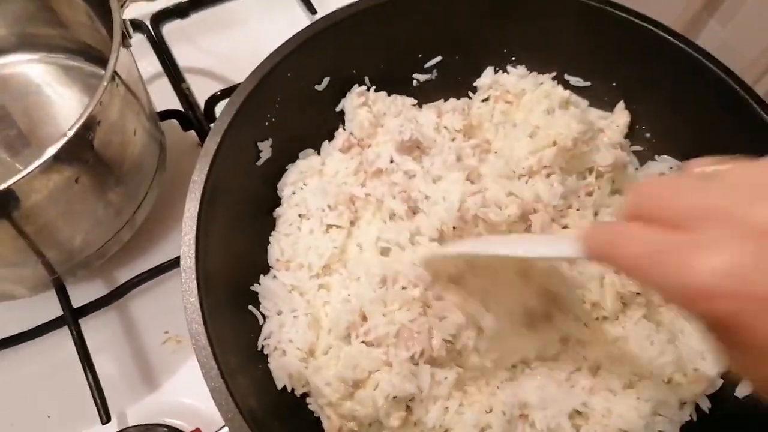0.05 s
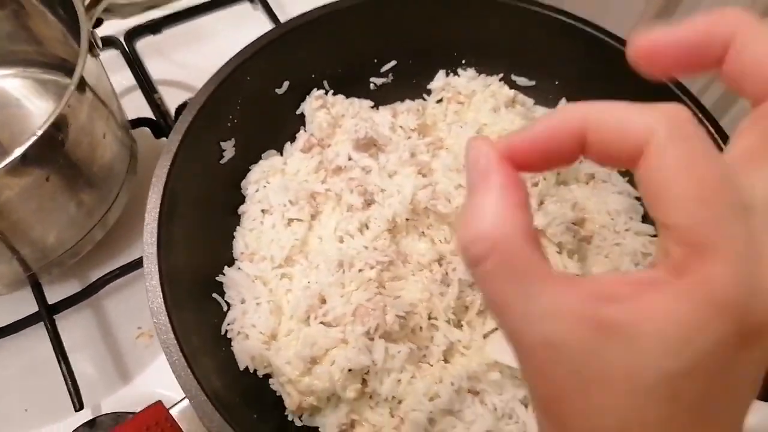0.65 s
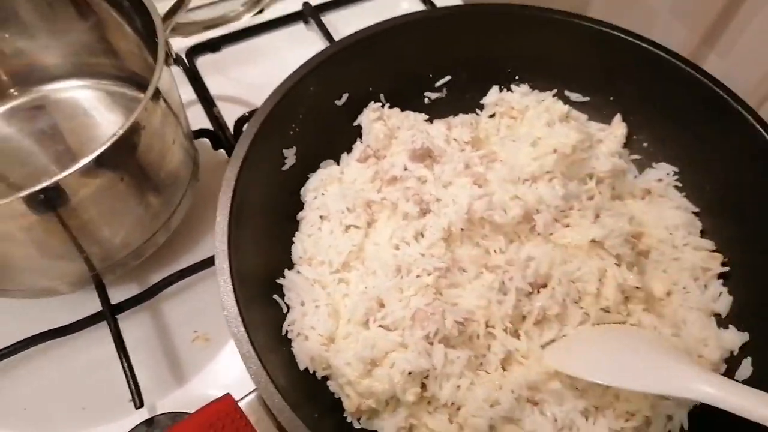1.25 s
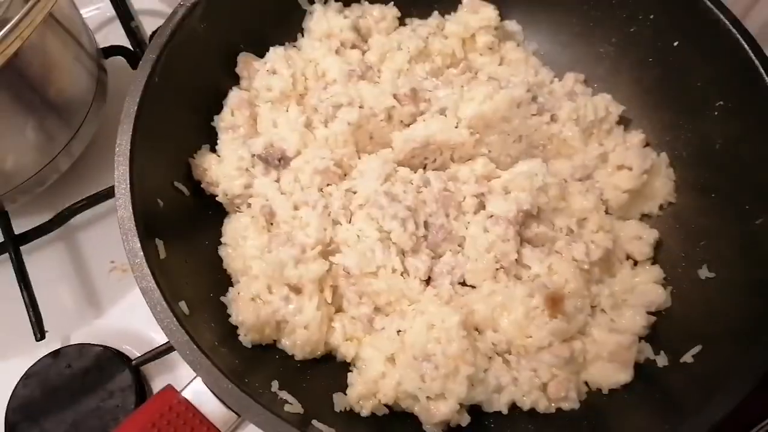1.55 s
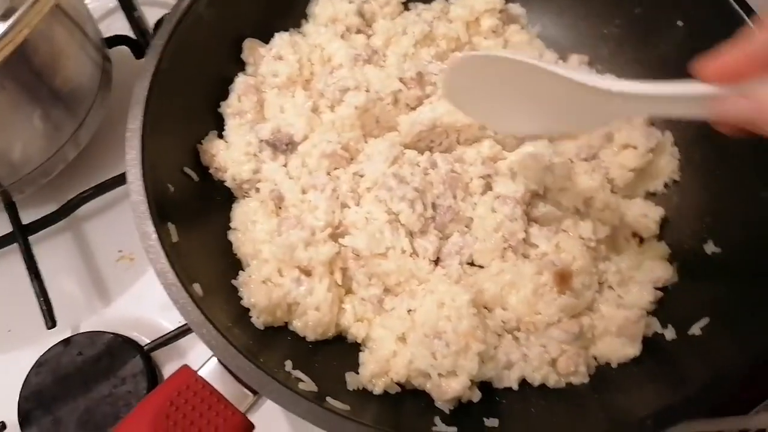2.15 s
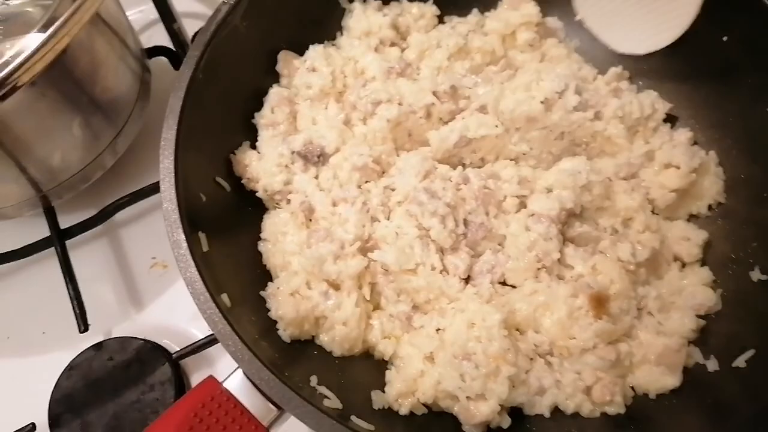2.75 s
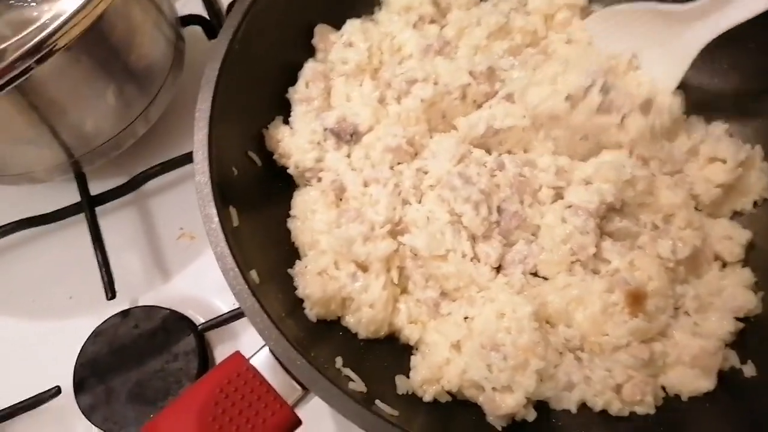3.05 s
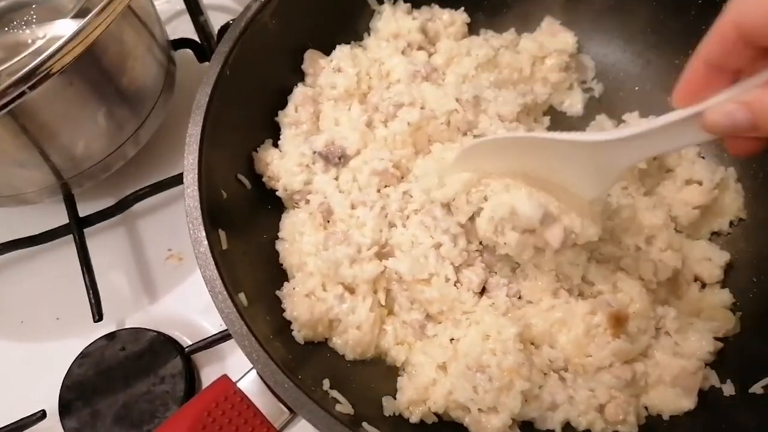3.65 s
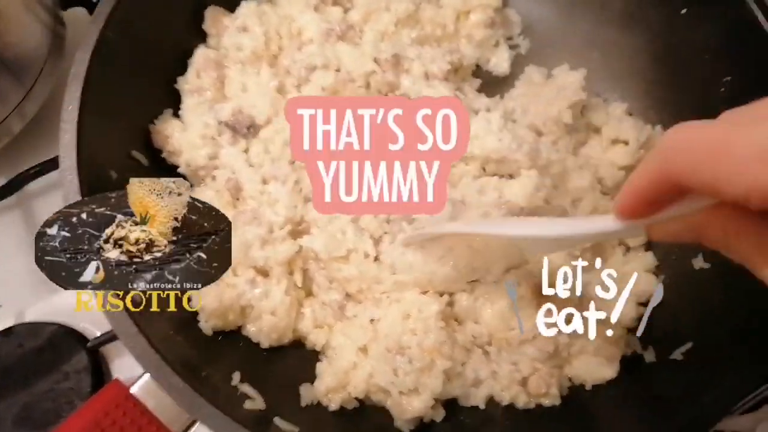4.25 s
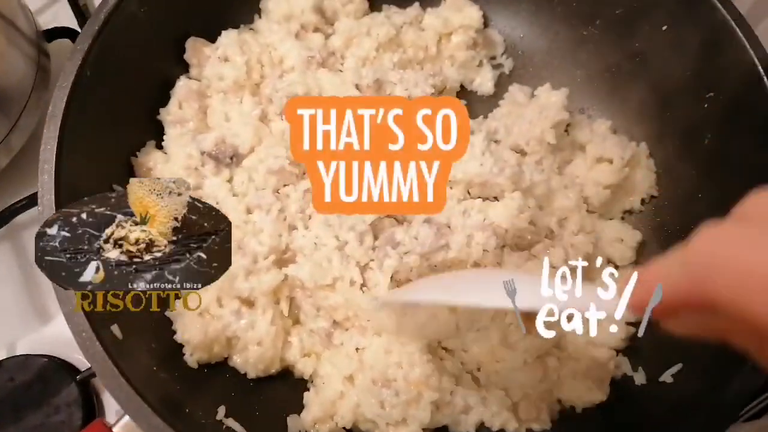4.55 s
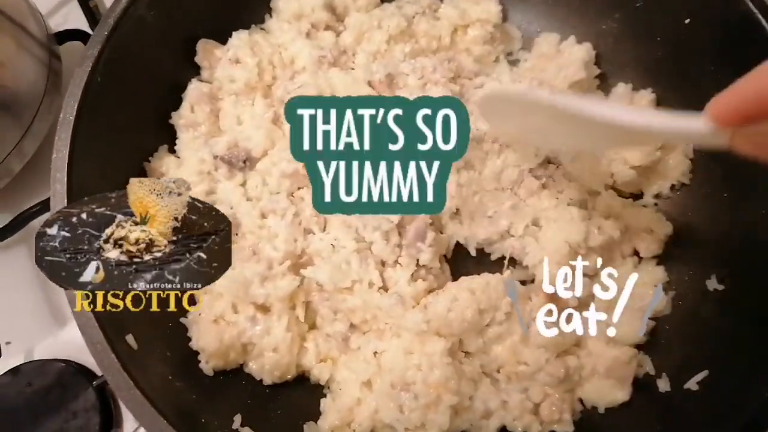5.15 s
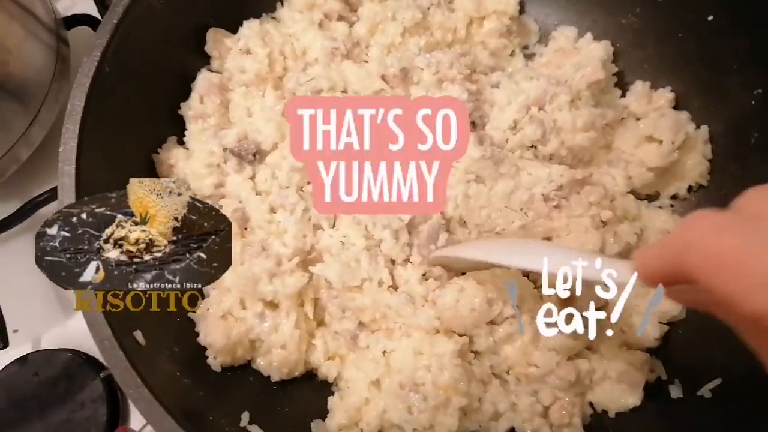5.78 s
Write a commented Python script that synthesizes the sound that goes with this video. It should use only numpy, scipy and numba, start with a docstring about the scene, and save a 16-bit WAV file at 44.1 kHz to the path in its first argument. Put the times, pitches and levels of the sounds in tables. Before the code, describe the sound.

Close to a frying pan in a kitchen, faint simmering and a light plastic clack sit over the low drone of a gas flame and extractor fan. The sound cuts out for a moment and returns with rice frying. A spatula pushes through it in uneven strokes, making wet smacks, flares of sizzle and soft rumbles of the pan, with sharp little pops of fat throughout.

```python
"""First you hear a gas burner roaring under a humming hood, and risotto barely simmering in a pan.
A plastic spatula is put down with a clack, and steam hisses out from under the rice.
After a short silence the rice sizzles: water turns to steam in hot fat, in countless tiny bursts.
Now the spatula stirs. Wet rice flares up on the bare metal, sticky grains squelch, the pan rumbles
on its grate, big bubbles pop and pockets of air smack flat."""
import sys
import numpy as np
from scipy import signal
from scipy.fft import rfft, irfft
from scipy.io import wavfile
from scipy.ndimage import uniform_filter1d
from numba import njit

SR = 44100
rng = np.random.default_rng(int(sys.argv[2]) if len(sys.argv) > 2 else 0)


def output_pcm(signal):
    """Save a mono or channel-first signal as 16-bit PCM at the path in sys.argv[1].

    Samples are clipped to [-1, 1] before scaling.
    """
    pcm = np.clip(np.atleast_2d(signal).T, -1, 1) * 32767
    wavfile.write(sys.argv[1], SR, np.round(pcm).astype(np.int16))


N = 265482
T = np.arange(N) / SR
OPPOSITE = np.array([[1], [-1]])  # plus on the left, minus on the right


def undb(db):
    """Turn decibels into a number to multiply by."""
    return 10 ** (np.asarray(db) / 20)


def unit(x):
    """Scale a sound to an average power of one."""
    return x / np.sqrt(np.mean(x ** 2))


def balance(left_db):
    """Left and right gains. A balance is how many dB louder the left side is than the right."""
    return undb(OPPOSITE * left_db / 2)


def curve(rows):
    """Join (time, value) points with straight lines."""
    return np.interp(T, *np.transpose(rows))


def add(out, start, sound):
    """Mix in a short stereo sound at a time in seconds."""
    i = int(start * SR)
    out[:, i:i + sound.shape[1]] += sound[:, :N - i]


def colour(x, points, size=1024):
    """Shape the tone through (Hz, dB) points. Nothing rings ahead of a click, so it stays sharp."""
    hz, db = np.transpose(points)
    log_hz = np.log(np.fft.rfftfreq(size, 1 / SR) + 1)
    log_gain = np.log(undb(np.interp(log_hz, np.log(hz), db)))
    cepstrum = irfft(log_gain)[:size // 2]
    cepstrum[1:] *= 2  # moves all the ringing to after the click
    response = irfft(np.exp(rfft(cepstrum, size)))
    return signal.fftconvolve(x, response[None], axes=1)[:, :N]


def wander(rate):
    """A smooth random wobble, about one in size, with `rate` new values a second."""
    hold = int(SR / rate)
    steps = rng.standard_normal(4096)[np.arange(N) // hold]
    return unit(uniform_filter1d(uniform_filter1d(steps, hold), hold))


def swell(start, length, rise, fade):
    """A loudness shape that rises, holds and dies away (all times in seconds)."""
    return np.clip((T - start) / rise, 0, 1) * np.exp(-np.maximum(T - start - length, 0) / fade)


def swells(events, fade_s):
    """Left and right gains for many swells; where they overlap, their powers add."""
    return np.sqrt(sum((undb(db) * balance(left_db) * swell(start, length, rise, fade_s)) ** 2
                       for start, rise, length, db, left_db in events))


def noise_band(hz, sharpness, samples):
    """Two separate noises, each filtered twice around one pitch."""
    b, a = signal.iirpeak(hz, sharpness, fs=SR)
    return signal.lfilter(b, a, signal.lfilter(b, a, rng.standard_normal((2, samples))))


def hollow_rush(resonances, stereo_db):
    """Swirling air rings a hollow space, a little differently on the left and right."""
    out = 0
    for hz, width, db, left_db in resonances:
        shared, apart = noise_band(hz, hz / (2 * width), N)
        out = out + undb(db) * balance(left_db) * (shared + undb(stereo_db) * apart * OPPOSITE)
    return unit(out)


@njit
def pings(starts, hz, decay, sizes, n):
    """Quickly fading tones, each reaching the left and right at its own time and strength."""
    out = np.zeros((2, n))
    for k in range(len(hz)):
        turn_and_fade = np.exp(2j * np.pi * hz[k] / SR - 1 / (decay[k] * SR))
        for side in range(2):
            tone, first = sizes[side, k] + 0j, int(starts[side, k] * SR)
            for i in range(max(first, 0), min(first + int(6 * decay[k] * SR), n)):
                tone *= turn_and_fade
                out[side, i] += tone.imag
    return out


def bubbles(rate, low_hz, high_hz, decay_ms, spread_db, scatter_db=1.5, bounce=0.97):
    """Tiny bubbles burst all over the pan, `rate` a second: many faint ones, a few strong ones."""
    when, pitch, life, size, place, side, left_path, right_path = rng.random((int(rate * N / SR), 8)).T
    low, high = (np.broadcast_to(edge, N)[(when * N).astype(int)] for edge in (low_hz, high_hz))
    hz = low + (high - low) * pitch
    decay = decay_ms / 1000 * 2 ** (2 * life - 1)
    strength = undb(-spread_db * np.log(size + 0.0018)) * balance(scatter_db * (2 * side - 1))
    starts = when * N / SR + OPPOSITE * (place - .5) * .0003
    echo_s = .0003 + .002 * np.array([left_path, right_path])  # a bounce off the pan wall
    return pings(starts, hz, decay, strength, N) + bounce * pings(starts + echo_s, hz, decay, strength, N)


def sputter(rate, tail_s, spread_db):
    """Puffs of spray, about `rate` a second: each starts at once and dies within milliseconds."""
    chance, size = rng.random((2, N))
    energy = (chance < rate / SR) * undb(-spread_db * np.log(size + 0.015)) ** 2
    fading = signal.lfilter([1], [1, -np.exp(-2 / (tail_s * SR))], energy + 1e-18)
    return np.sqrt(fading) * rng.standard_normal((2, N))


def kitchen(x, room_db, near_db, room_s=0.11, near_s=0.012):
    """Quick echoes from the stove top and tiles, then the fading echo of the small room."""
    t = T[:SR // 5]
    echo = 0
    for db, fade_s in ((near_db, near_s), (room_db, room_s)):
        tail = rng.standard_normal((2, len(t))) * (t > .001) * np.exp(-np.log(1000) * t / fade_s)
        echo = echo + undb(db) * tail / np.sqrt(np.sum(tail ** 2) / 2)
    return x + signal.fftconvolve(x, echo, axes=1)[:, :N]


def delay_left(x, ms):
    """Make the left side later than the right (earlier if negative)."""
    return np.array([np.interp(T - sign * ms / 2000, T, side) for sign, side in zip((1, -1), x)])


# The simmering part and the sizzling part: (start [s], end [s])
PARTS = [(-1, 1.413), (1.851, 7)]
def by_part(first, second):
    """Use one value until the first part ends, and the other from then on."""
    return np.where(T > PARTS[0][1], second, first)


# Hollow notes of the stove and hood: (pitch [Hz], rough width [Hz], level [dB], balance [dB])
STOVE_NOTES = [(31.8, 18, -15, 2.5), (78, 26, 1.5, 2.5), (112.3, 19.7, -0.5, 6), (160.1, 11.7, 2, 4),
               (198.3, 9.2, -4, 5.5), (252.3, 26.3, 1.5, 1), (300, 25, -6, -4), (395, 153, -10.5, -4)]
# Notes of the gas jet in the burner: (pitch [Hz], rough width [Hz], level [dB], balance [dB])
JET_NOTES = [(810, 41, -5, 5.5), (900, 50, -7, 3.5), (1002, 22, 1, 6), (1061, 25.4, 2.5, 4.5),
             (1102, 29, 0, 6), (1143, 31.5, 0.5, 2), (1212, 16, -4.5, 3), (1492, 81, -7, 3.5)]
# Tone of the hissing gas: (frequency [Hz], level [dB])
GAS_TONE = [(100, -19), (500, 1.5), (1400, 1.5), (2000, -7.5), (2800, -9.5), (3600, -18), (5800, -26),
            (8500, -37), (12000, -37), (16000, -48.5)]
def burner():
    """The flame roars low, while the gas jet makes a hollow rush and a broad hiss."""
    roar = hollow_rush(STOVE_NOTES, stereo_db=-14) * undb(by_part(-44.5, -46.5))
    jet = hollow_rush(JET_NOTES, stereo_db=-7.5) * undb(by_part(-47, -49.5) + 1.5 * wander(6.9))
    shared, apart = rng.standard_normal((2, N))
    hiss = unit(colour(shared + undb(-1.5) * apart * OPPOSITE, GAS_TONE))
    return roar + jet + hiss * undb(-52.5 + 1.1 * wander(22))


# Tones of the hood fan: (pitch [Hz], level in first part [dB], level in second part [dB])
FAN_TONES = [(198.9, -52.5, -61.5), (247.9, -62.5, -60), (757, -88, -67.5), (1161, -78, -63)]
def hood_fan():
    """The fan hums, and draughts make its loudness and pitch waver."""
    waver_hz, waver_db = 2.8, 2.8
    hum = 0
    for hz, first_db, second_db in FAN_TONES:
        phase = 2 * np.pi * np.cumsum(hz + waver_hz * wander(16)) / SR
        level = undb(by_part(first_db, second_db) + waver_db * wander(14))
        hum = hum + np.sqrt(2) * level * np.sin(phase)
    return hum


# Tone of bubbles under the rice: (frequency [Hz], level [dB])
SIMMER_TONE = [(600, -25), (1500, 11.5), (2600, 1), (4000, -5.5), (5800, -10), (8200, -18.5),
               (10000, -17.5), (13000, -32), (16000, -50)]
def simmer():
    """A fine fizz, muffled by the resting rice, slowly settles off to the right."""
    fizz = colour(bubbles(9000, 800, 15000, decay_ms=0.17, spread_db=2.5), SIMMER_TONE)
    settling = undb(-58.5 - 1.5 * T)
    return unit(kitchen(fizz, room_db=-7.5, near_db=-15)) * settling * balance(-15.5) * by_part(1, 0)


# Soft bumps through the rice: (time [s], level [dB], pitch [Hz])
BUMPS = [(.025, -38.5, 189), (.11, -33, 74), (.695, -36, 70), (1.86, -40, 285), (1.915, -36, 273),
         (2.521, -41, 247), (2.56, -36, 150), (3.299, -36.5, 98.5), (3.327, -37, 152), (4.701, -40, 132),
         (5.233, -36, 155), (5.461, -34.5, 262)]
# Knocks on the pan: (time [s], level [dB], balance [dB], dull above [Hz], amount of ring [0-1])
KNOCKS = [(0.3848, -30, -9.5, 4840, 0.5), (0.389, -34.5, -4, 4600, 0.5), (3.842, -31.5, 4, 6500, 0.25),
          (4.085, -23.5, -5, 9400, 0.13)]
# Notes the spatula and pan ring with: (pitch [Hz], level [dB], time to fade by 60 dB [s])
PAN_NOTES = [(1390, 4, 0.035), (1470, 5.5, 0.05), (2250, 1, 0.04), (2450, 8, 0.04), (2740, 7.5, 0.045),
             (3170, -1, 0.032), (3860, -6, .035), (4450, -1.5, 0.04), (4800, -2, .04), (5210, -2, .04),
             (5680, -1.5, .045)]
def spatula():
    """Plastic clacks briefly ring the pan; bumps cushioned by rice only thud."""
    out, t = np.zeros((2, N)), T[:SR // 6]
    for start, db, left_db, dull_hz, ring_amount in KNOCKS:
        ring = 0
        for hz, note_db, fade_s in PAN_NOTES:
            phase = 2 * np.pi * (hz * t + rng.random((2, 1)) / 3)
            ring = ring + undb(note_db) * np.sin(phase) * np.exp(-np.log(1000) * t / fade_s)
        crack = rng.standard_normal((2, len(t))) * np.exp(-t / 0.0026)
        band = signal.butter(3, [1200, dull_hz], "band", fs=SR)
        clack = signal.lfilter(*band, crack + 0.21 * ring_amount * ring)
        add(out, start, undb(db) * balance(left_db) * clack / np.abs(clack).max())
    age = t / 0.0042  # a bump's swell peaks at age one
    for start, db, hz in BUMPS:
        add(out, start, undb(db) * np.sin(2 * np.pi * hz * t) * age * np.exp(1 - age) * balance(1.4))
    return kitchen(out, room_db=-11, near_db=-6.5)


# Tone of the escaping steam: (frequency [Hz], level [dB])
STEAM_TONE = [(1000, -23), (3000, 11.5), (4500, 0.5), (5800, 3.5), (7800, -5.5), (8600, -22),
              (11000, -17.5), (13000, -28)]
def steam():
    """Late in the first part, steam finds a way out from under the rice and hisses."""
    start_s, rise_s = 1.125, 0.079
    hiss = unit(colour(sputter(2515, tail_s=.002, spread_db=-1), STEAM_TONE))
    escaping = undb(-64.5) * np.clip((T - start_s) / rise_s, 0, 1)
    return hiss * escaping * balance(-18) * by_part(1, 0)


# Tone of rice left to fry: (frequency [Hz], level [dB])
SIZZLE_TONE = [(300, -11.5), (900, -16), (2000, 2.5), (3500, 0), (5400, -0.5), (6500, -0.5), (7700, -1),
               (9800, -4), (11500, -12.5), (13000, -13.5), (15500, -22)]
def sizzle():
    """Water flashes to steam in hot fat: fizz, spray and stray ticks, growing as the pan heats."""
    start_db, heating_db_per_s = -51, 0.96
    fizz = unit(bubbles(12000, 484, 14600, decay_ms=0.079, spread_db=4))
    spray = unit(sputter(160, tail_s=0.005, spread_db=0))
    ticks = unit(bubbles(90, 2700, 10400, decay_ms=0.11, spread_db=1.3, scatter_db=0, bounce=0.37))
    frying = colour(fizz + undb(-5) * spray + undb(-11) * ticks, SIZZLE_TONE)
    heating = undb(start_db + heating_db_per_s * (T - PARTS[1][0]))
    return unit(kitchen(frying, room_db=-6, near_db=-17, room_s=0.17)) * heating


# Surges of sizzle: (time [s], rise [s], length [s], level [dB], crackle pitch [Hz], balance [dB])
FLARES = [(1.82, 0.022, 0.17, -49, 5500, -0.5), (2.432, .03, 0.049, -48.5, 4200, 8),
          (2.53, 0.026, 0.22, -57.5, 5000, 16), (2.872, 0.033, 0.084, -53, 4600, 7),
          (2.955, 0.023, 0.034, -40, 8500, -1), (2.99, 0.034, 0.17, -44, 4900, 1.5),
          (3.147, 0.036, 0.21, -46.5, 5100, 0.5), (3.556, 0.025, 0.18, -54, 5500, 0),
          (3.822, 0.023, 0.029, -49, 4800, 3), (3.93, 0.031, 0.105, -47.5, 5200, 0.5),
          (4.18, 0.037, 0.13, -50.5, 6000, -1), (4.67, 0.017, 0.21, -50.5, 5800, -1),
          (4.832, 0.11, 0.14, -44, 6000, -1.5), (4.95, 0.036, 0.094, -44.5, 4400, 0),
          (5.044, 0.049, 0.076, -45.5, 3900, -2), (5.24, 0.03, 0.051, -48.5, 5000, 0),
          (5.31, 0.033, 0.3, -49, 5500, 0.5), (5.788, 0.04, 0.064, -45.5, 5200, 1)]
# Tone of a fresh flare, finer than the resting sizzle: (frequency [Hz], level [dB])
FLARE_TONE = [(300, -15), (900, -19), (2000, -1), (3500, 2.5), (5200, 0), (6500, -1.5), (7700, -1),
              (9800, -3.5), (11500, -12.5), (13000, -21), (15500, -20)]
def flares():
    """Wet rice lands on bare metal and flares into a fine hiss with small crackling bubbles."""
    hiss = colour(sputter(650, tail_s=0.0036, spread_db=2.2), FLARE_TONE)
    pitch = curve([(start + length / 2, hz) for start, _, length, _, hz, _ in FLARES])
    crackle = bubbles(2500, 0.8 * pitch, 1.2 * pitch,
                      decay_ms=0.28, spread_db=2.5, scatter_db=8, bounce=0.35)
    flaring = swells([(start, rise, length, db, left_db)
                      for start, rise, length, db, _, left_db in FLARES], fade_s=0.038)
    return unit(unit(hiss) + undb(-5) * unit(crackle)) * flaring


# Tone of sticky wet grains: (frequency [Hz], level [dB])
SQUELCH_TONE = [(200, -18.5), (450, -1.5), (700, -10), (1000, -8), (1600, 3.5), (2100, -3.5), (2700, -0.5),
                (3400, -4.5), (5000, -23), (10000, -41)]
# Spatula strokes through the rice:
# (time [s], length [s], squelch level [dB], air pocket pitch [Hz], rumble level [dB], balance [dB])
STROKES = [(1.83, 0.26, -50.5, 2360, -57, 3), (2.168, 0.058, -44.5, 2600, -65.5, -1),
           (2.312, 0.082, -58, 2500, -45.5, 9), (2.416, 0.089, -45, 2550, -44, 3),
           (2.501, 0.099, -48, 2450, -45, 2), (2.6, 0.25, -57, 2800, -47.5, 17),
           (2.868, 0.066, -55, 2930, -49, 11), (3.105, 0.15, -47, 2120, -74, 2.5),
           (3.56, 0.14, -50, 2300, -49, 0), (3.721, 0.023, -43.5, 2700, -43, -1),
           (3.825, 0.041, -50, 3180, -43.5, -2), (3.96, 0.08, -48, 2180, -48.5, -3),
           (4.25, 0.036, -48, 2310, -53, -4), (4.648, 0.071, -51, 2460, -45.5, 0),
           (4.976, 0.16, -48.5, 1860, -56, -3), (5.293, 0.15, -46.5, 2850, -47, -3.5),
           (5.532, .1, -48.5, 2800, -47.5, -2), (5.72, 0.052, -52, 2400, -43.5, -3),
           (5.781, 0.085, -47, 2120, -65, -4), (5.98, .06, -50, 2400, -51, -6)]
STROKE_RISE_S, STROKE_FADE_S = 0.021, 0.023
def squelch():
    """Wet rice bubbles with dull clicks; strokes pull sticky grains apart and ring air pockets."""
    grains = unit(bubbles(2500, 280, 5000, decay_ms=0.16, spread_db=3.3))
    spray = unit(sputter(150, tail_s=0.0039, spread_db=1.5))
    clicks = unit(kitchen(colour(grains + undb(-3) * spray, SQUELCH_TONE), room_db=-7.5, near_db=-11.5))
    pitch = curve([(start + length / 2, hz) for start, length, _, hz, _, _ in STROKES])
    pockets = unit(bubbles(1300, 0.827 * pitch, 1.095 * pitch, decay_ms=1, spread_db=2))
    stirring = swells([(start, STROKE_RISE_S, length, db, left_db)
                       for start, length, db, _, _, left_db in STROKES], STROKE_FADE_S)
    click_level = np.hypot(undb(-52), undb(-1.5) * stirring)  # steady bubbling plus the strokes
    return clicks * click_level + pockets * undb(-4.5) * stirring


def rumble():
    """Each stroke shoves the pan on its grate and wakes the stove's hollow notes."""
    push = sum(undb(db) * swell(start, length, STROKE_RISE_S, STROKE_FADE_S)
               for start, length, _, _, db, _ in STROKES)
    return hollow_rush(STOVE_NOTES, stereo_db=-23) * push


# The loudest bursts: (time [s], level [dB], pitch [Hz], decay [ms], balance [dB])
POPS = [(1.8885, -36, 4450, 0.096, -4), (1.916, -27.5, 6100, 0.19, -2), (1.938, -31, 6300, .12, 0),
        (1.9643, -38, 5500, .1, -3), (2.0239, -34, 5600, .12, -2), (2.0308, -30.5, 7300, .06, -7),
        (2.254, -32, 6700, .06, 10), (2.2745, -28, 7900, 0.045, 6), (2.7328, -36, 3630, 0.32, 5),
        (2.8936, -37.5, 4370, .35, 8), (2.9073, -31, 4450, 0.12, 4), (2.9394, -29.5, 6200, 0.064, 6),
        (3.019, -29, 4770, .1, 2), (3.056, -27.5, 5170, .13, -4), (3.112, -26, 4800, 0.12, -10),
        (3.1532, -23.5, 5070, 0.15, -2), (3.2265, -26, 5960, 0.08, 2), (3.265, -31, 5340, 0.27, 5),
        (3.283, -23.5, 5360, 0.14, 11), (3.3155, -32, 5760, .16, 8), (3.3422, -31.5, 9260, .1, -5),
        (3.423, -32, 3960, 0.087, -8), (3.5818, -32.5, 4430, 0.14, -1), (3.888, -36, 5900, 0.086, -1),
        (4.0236, -29, 4040, 0.085, -1), (4.2776, -33, 3900, 0.096, -4), (4.3154, -31, 9600, .06, -5),
        (4.3634, -29, 7200, .07, -3), (4.413, -30.5, 6200, 0.12, -3), (4.4499, -33, 4250, 0.074, -3),
        (4.5403, -27.5, 6670, .06, -1), (4.747, -27, 7450, 0.047, 5), (4.8936, -26, 8000, 0.069, 4),
        (4.9547, -24, 5900, 0.034, 7), (5.469, -30, 5500, .08, -6), (5.5093, -29.5, 3180, 0.09, 3),
        (5.6636, -24.5, 6100, 0.057, -4), (5.8459, -26.5, 5400, .15, 0), (5.915, -33, 7300, 0.065, 4)]
def pops():
    """Big bursts of fat, steam and trapped air: each swells in a cycle or two and dies as fast."""
    out, t = np.zeros((2, N)), T[:SR // 30]
    for start, db, hz, decay_ms, left_db in POPS:
        age = 1000 * t / decay_ms
        add(out, start, undb(db) * balance(left_db) * np.sin(2 * np.pi * hz * t) * age * np.exp(1 - age))
    return kitchen(out, room_db=-8, near_db=-2.5, near_s=0.022)


# Wet smacks in the rice: (time [s], level [dB], pitch [Hz])
SMACKS = [(2.206, -42, 2660), (2.219, -48, 2700), (2.442, -41.5, 2570), (2.466, -48, 2560),
          (2.546, -43, 2550), (2.731, -49, 1680), (3.135, -43, 2900), (3.741, -47, 2770),
          (4.993, -42, 1870), (5.039, -41, 1750), (5.056, -45, 1800), (5.385, -42, 2770),
          (5.546, -47, 1650), (5.82, -48, 2200), (5.845, -40, 2060)]
def smacks():
    """The spatula squeezes an air pocket flat, and the air leaves in one short gush."""
    rise_s, sharpness = 0.0028, 1 / 0.24
    out, age = np.zeros((2, N)), T[:SR // 20] / rise_s
    for start, db, hz in SMACKS:
        gush = unit(noise_band(hz, sharpness, len(age)))
        add(out, start, undb(db) * gush * age * np.exp(1 - age) * balance(2.5))
    return out


# Notes of the pan's bowl shape: (pitch [Hz], width [Hz], level [dB])
BOWL_NOTES = [(1520, 59, -10), (1660, 36, -16), (2240, 80, -14), (2680, 150, -19), (4800, 170, -17),
              (5480, 160, -7), (7560, 220, -11), (9340, 200, -10)]
def bowl(x):
    """The pan rings faintly along with what fries in it."""
    return x + sum(undb(db) * signal.lfilter(*signal.iirpeak(hz, hz / width, fs=SR), x)
                   for hz, width, db in BOWL_NOTES)


# Which side hears more of the frying: (frequency [Hz], balance [dB])
SIDE_TONE = [(1000, 4.5), (2400, -0.5), (4400, 2), (6500, 1.5), (8200, 4.5), (10200, -7), (12000, -3.5),
             (15000, -3)]
def tint_sides(x):
    """Some pitches lean to the left and others to the right."""
    return np.vstack([colour(x[[side]], [(hz, sign * db / 2) for hz, db in SIDE_TONE])
                      for side, sign in enumerate((1, -1))])


def scene():
    """Simmering, then frying and stirring, over the sound of the stove."""
    sizzling = (sizzle() + flares()) * undb(0.5 * wander(25.07))  # the level flickers slightly
    rice = (sizzling + squelch()) * by_part(0, 1) + smacks()
    frying = tint_sides(bowl(rice) + pops())
    cooking = frying + simmer() + steam() + spatula() + rumble()
    stove = burner() + hood_fan()
    return cooking + by_part(delay_left(stove, ms=0.32), delay_left(stove, ms=-0.044))


def record(dry):
    """Put silence between the two parts, and remove the deepest bass and the highest treble."""
    low_hz, top_hz = 10, 15300
    audible = sum((T >= start) & (T < end) for start, end in PARTS)
    gate = uniform_filter1d(audible.astype(float), size=64)  # soft edges, so it does not click
    thinned = signal.sosfilt(signal.butter(1, low_hz, "high", fs=SR, output="sos"), dry)
    return signal.sosfilt(signal.ellip(10, .2, 80, top_hz, fs=SR, output="sos"), thinned * gate)


dry = scene()
out = record(dry)
output_pcm(out)
```